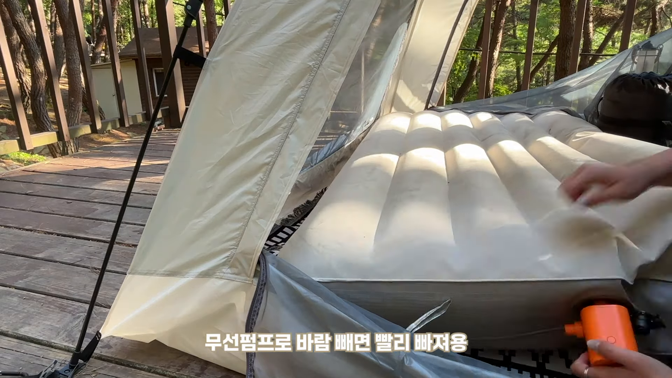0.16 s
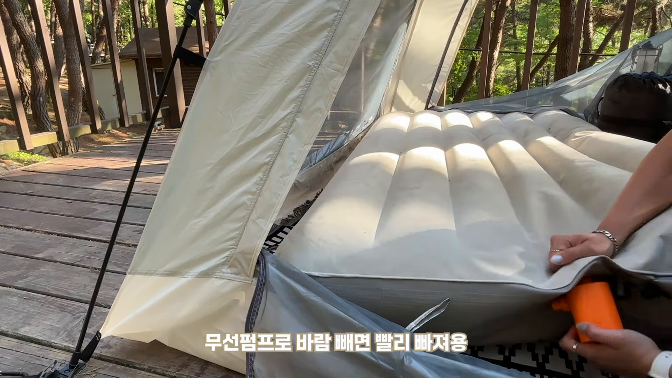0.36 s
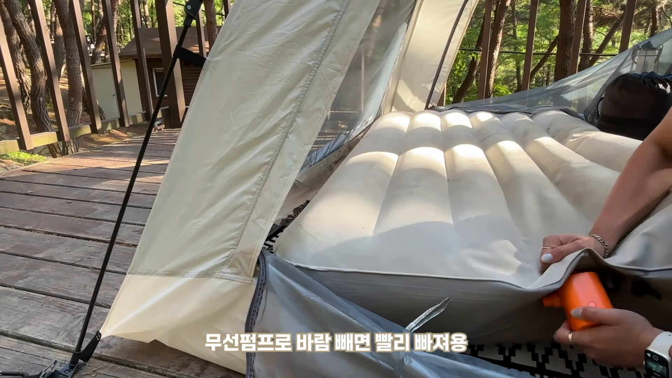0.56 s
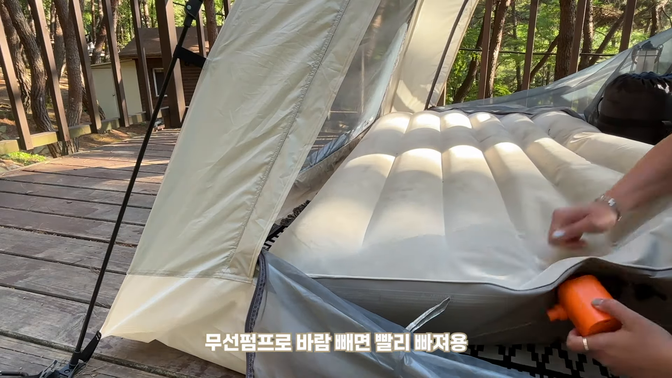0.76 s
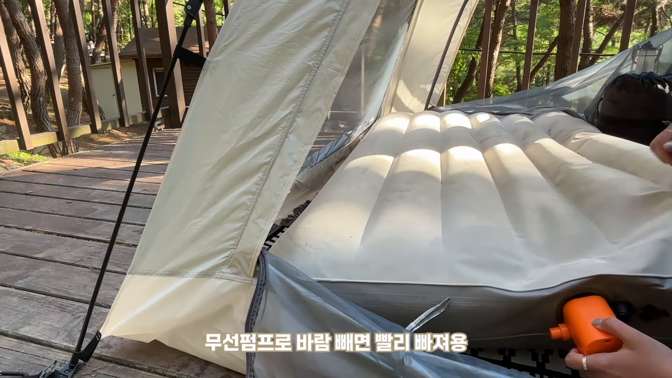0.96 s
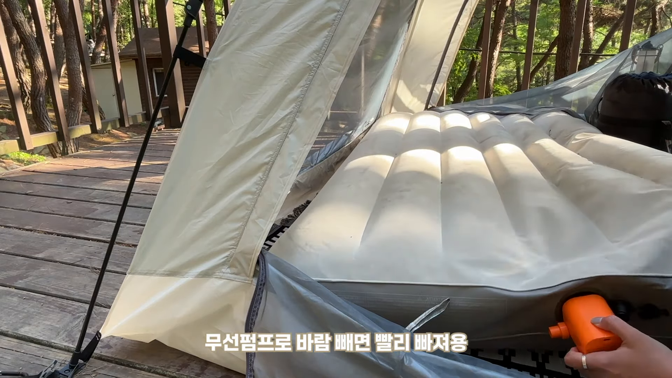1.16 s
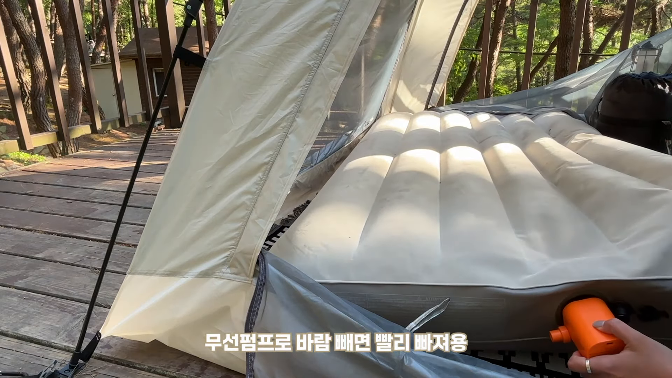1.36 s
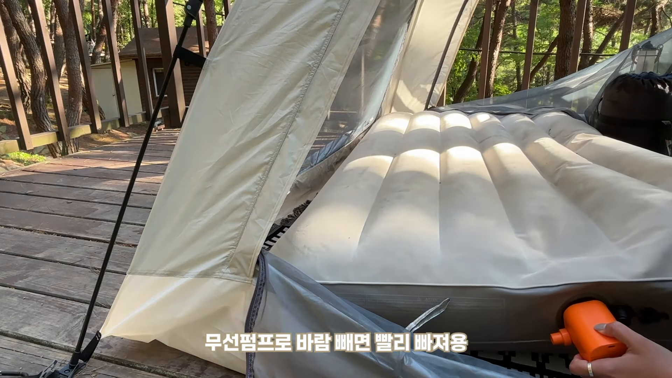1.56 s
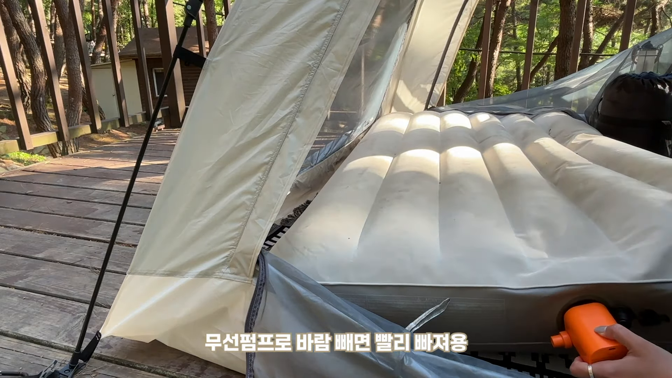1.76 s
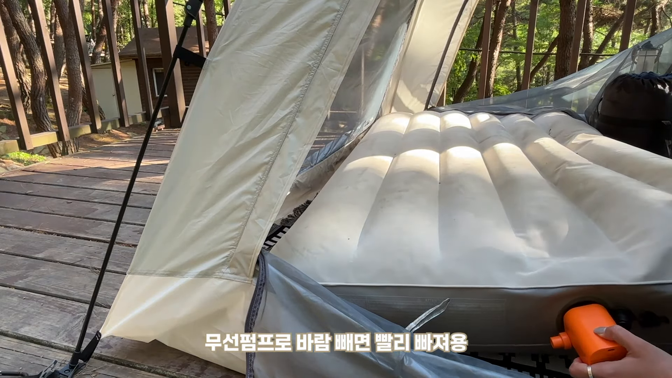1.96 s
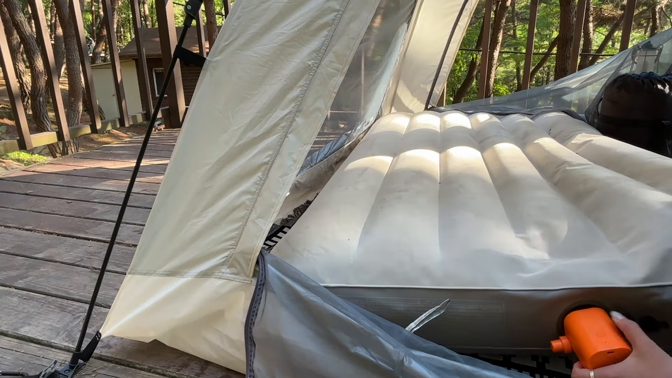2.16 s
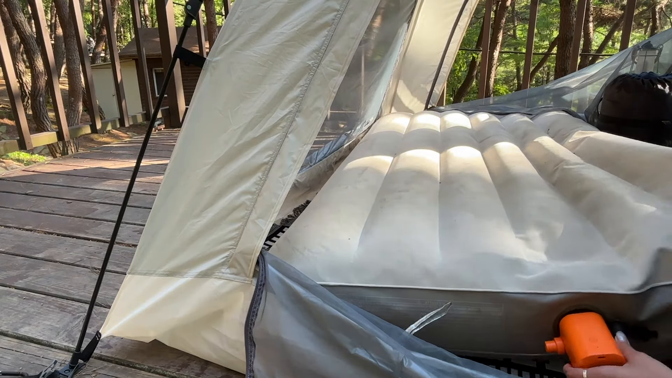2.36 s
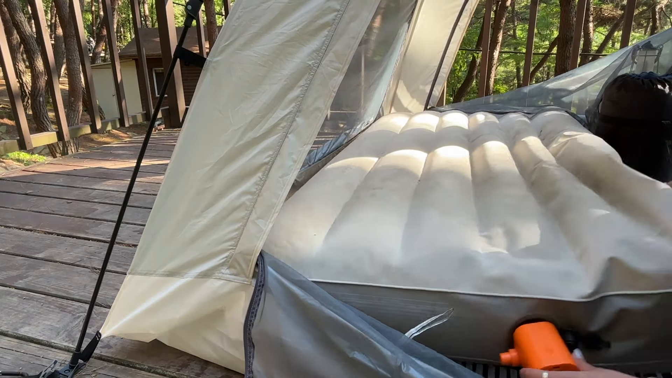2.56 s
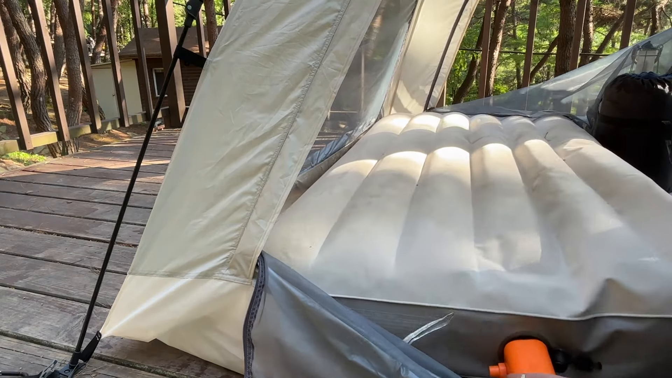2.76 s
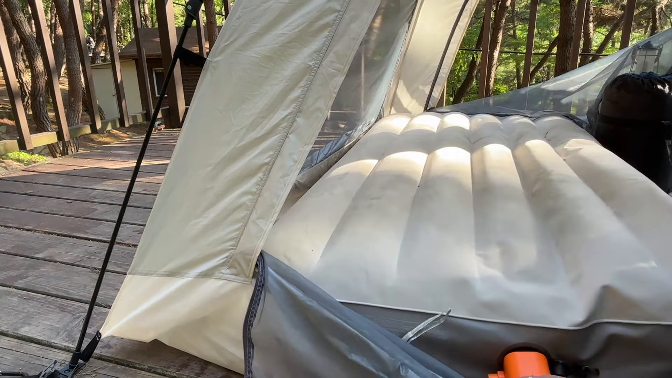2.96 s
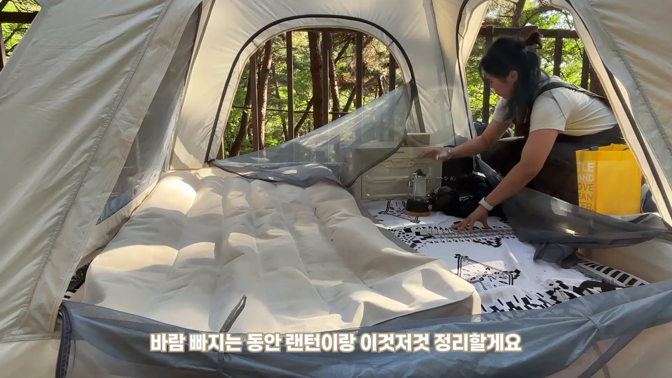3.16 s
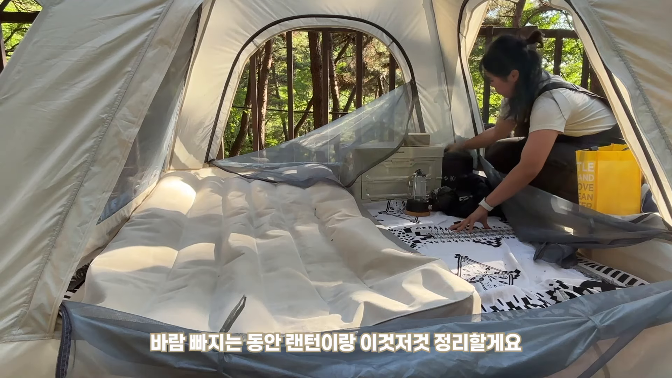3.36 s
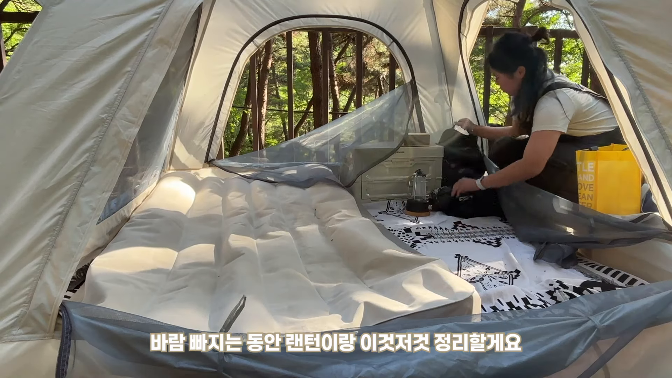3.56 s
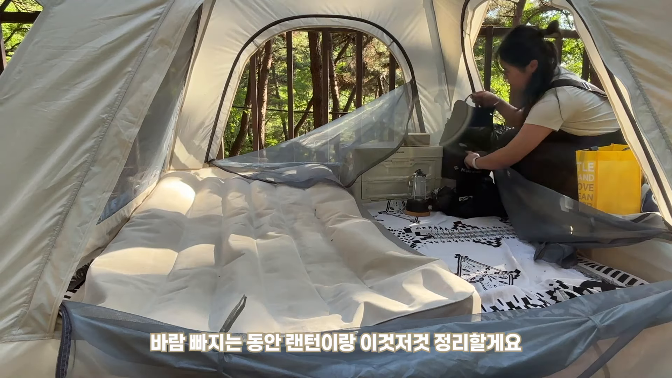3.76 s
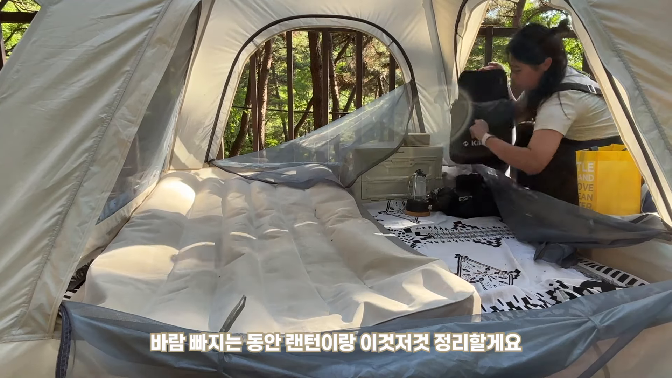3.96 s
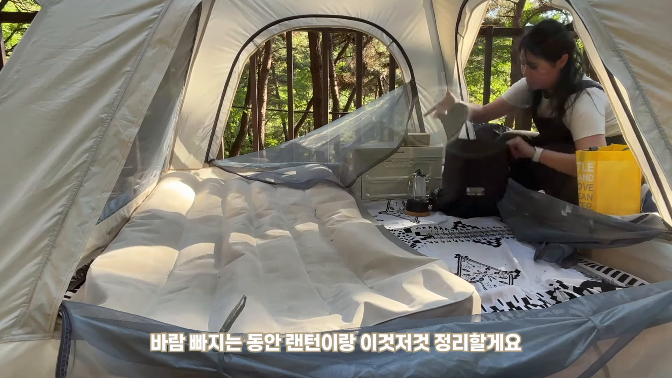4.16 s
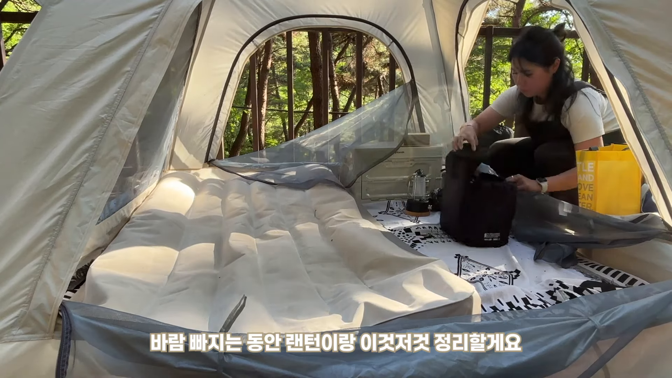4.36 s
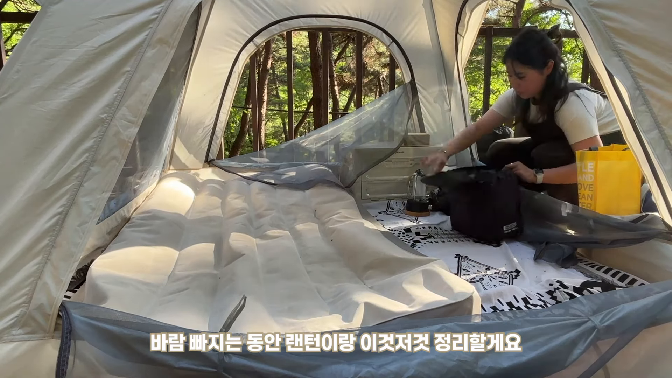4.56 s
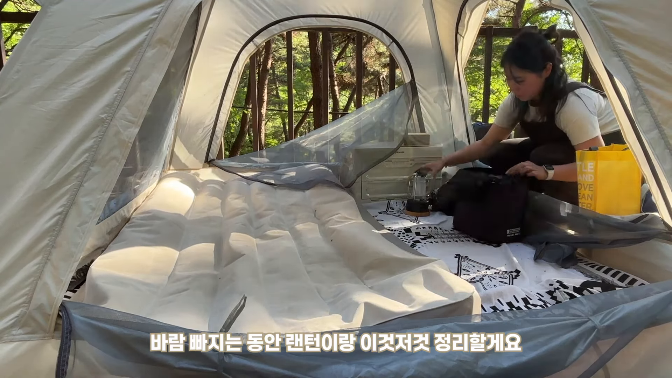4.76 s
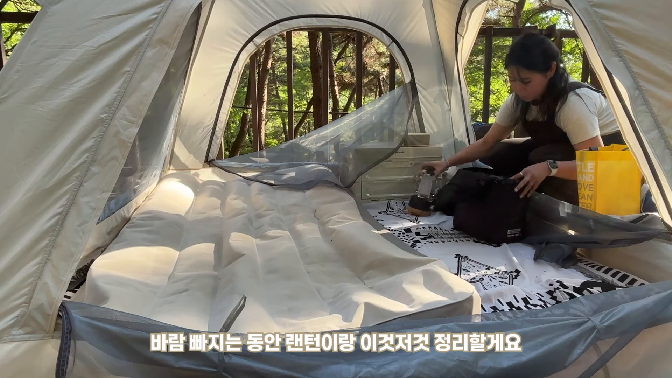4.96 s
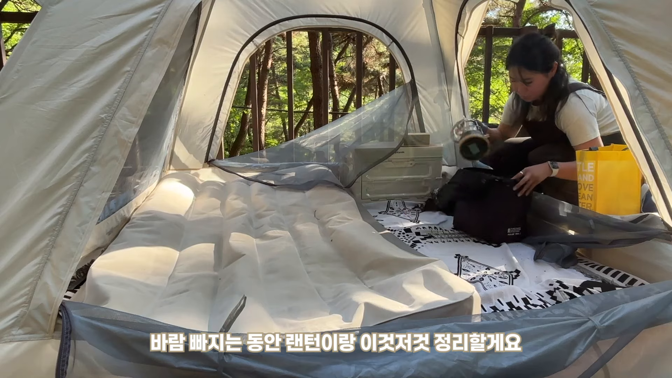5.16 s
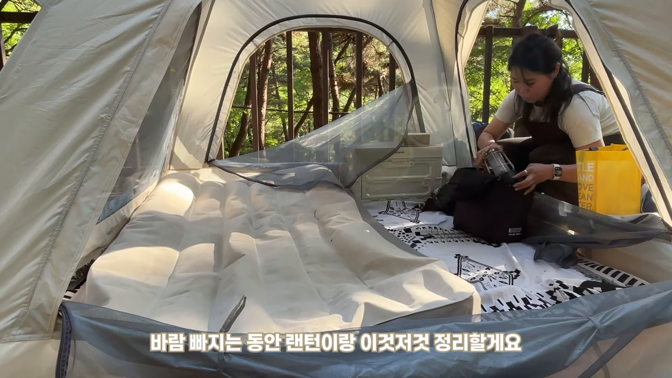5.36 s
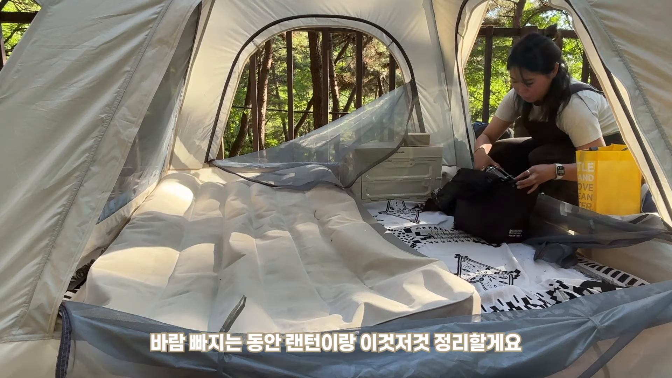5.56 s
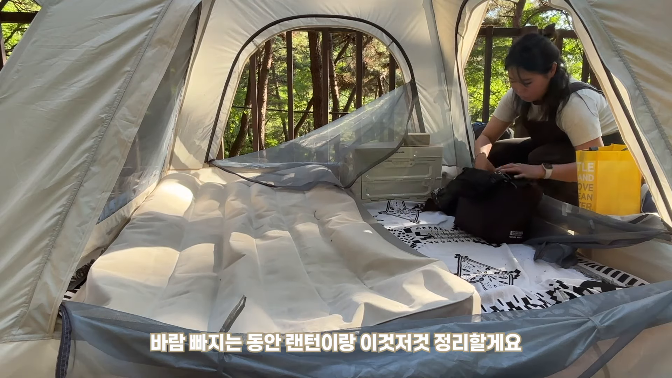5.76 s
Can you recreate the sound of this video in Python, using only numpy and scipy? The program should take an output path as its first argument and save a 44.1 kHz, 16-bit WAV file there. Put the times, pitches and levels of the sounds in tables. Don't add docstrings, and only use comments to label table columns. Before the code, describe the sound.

Outdoors, a very faint forest hush lies under close handling sounds. From 0.1 to 0.5 seconds coated fabric swishes, with a cluster of soft thuds on an air-filled mattress and small plastic ticks; a faint metallic tinkle follows near 0.7 and a crisp valve-cap click at 0.86. It is then nearly quiet until a thin, rapid insect trill at about 1.87 to 2.2. A switch clicks at 2.02 and a small pump spins up close by, its whine climbing steeply from about 2.2 and levelling near 2.6, with roaring air, hiss and shifting whistles as the hand moves it. At 3.07 the perspective jumps: the pump runs steadily and duller across the tent, its hiss slowly sinking. Packing adds light clicks around 4.2, a buckle and clip at 4.8 to 4.9, a strong case knock and sharp clacks at 5.3 to 5.45, and final ticks near 5.75. The pump keeps running.

```python
import sys
import numpy as np
from scipy import signal
from scipy.fft import rfft, irfft, next_fast_len
from scipy.io import wavfile
from scipy.ndimage import uniform_filter1d, map_coordinates

SR = 44100
rng = np.random.default_rng(int(sys.argv[2]) if len(sys.argv) > 2 else 0)


def transcribe(signal):
    frames = np.atleast_2d(signal).T
    limited = np.clip(frames, -1, 1)
    pcm = np.round(limited * 32767).astype(np.int16)
    wavfile.write(sys.argv[1], SR, pcm)


def volts_from_decibels(level):
    exponent = np.asarray(level, float) / 20
    return 10 ** exponent


N = 256662
TIME = np.arange(N) / SR
CUT_S = 3.069


def unit(x):
    return x / np.sqrt(np.mean(x ** 2) + 1e-20)


def along(points, hz):
    f, v = np.transpose(points)
    return np.interp(np.log(hz + 1), np.log(f + 1), v)


def curves(rows):
    s, *columns = np.transpose(rows)
    return [np.interp(TIME, s, column) for column in columns]


def wobble(rate):
    knots = rng.standard_normal(int(N * rate / SR) + 4)
    coarse = TIME[::16]
    return np.interp(TIME, coarse, map_coordinates(knots, [coarse * rate]))


def filtered(x, response):
    m = next_fast_len(len(x) + 8192)
    return irfft(rfft(x, m) * response(np.fft.rfftfreq(m, 1 / SR)), m)[:len(x)]


def resonances(modes, f):
    total = 0
    for k, (centre, width, db) in enumerate(modes):
        damping = 1j * f * width
        total = total + (-1) ** k * volts_from_decibels(db) * damping / (centre * centre - f * f + damping)
    return total


def rush(spectrum, modes, patchy_db, size=N):
    z = signal.stft(rng.standard_normal(size), nperseg=512)[2]
    field = uniform_filter1d(rng.standard_normal(z.shape), size=9, axis=0)
    field = uniform_filter1d(field, size=16, axis=1)
    noise = signal.istft(z * volts_from_decibels(patchy_db * unit(field)), nperseg=512)[1][:size]

    def colour(f):
        humps = sum(abs(resonances([mode], f)) ** 4 for mode in modes)
        return np.sqrt(volts_from_decibels(2 * along(spectrum, f)) + humps)

    return unit(filtered(noise, colour))


# (frequency [Hz], level [dB])
HUSH_COLOUR = [(60, -31), (85, -19.5), (120, -2.5), (200, -4), (330, -8.5), (470, -6), (700, -10),
               (1500, -9.5), (2100, -13.5), (2800, -20.5), (6000, -29.5), (10000, -30.5), (15800, -47)]
HUSH_DB = -61
GUST_S, GUST_LENGTH_S, GUST_DB = 4.18, .1, 3


def forest():
    gust_db = GUST_DB * np.exp(-.5 * ((TIME - GUST_S) / GUST_LENGTH_S) ** 2)
    swell_db = .6 * wobble(5)
    return volts_from_decibels(HUSH_DB + gust_db + 6.5 + swell_db) * rush(HUSH_COLOUR, [], patchy_db=1.0)


# (frequency [Hz], level [dB])
CLOTH_COLOUR = [(1500, -3), (3500, -0.5), (7000, 1.5), (10000, 0.5), (15500, -4.5)]
# (time of peak [s], peak level [dB], rise [dB/s], fall [dB/s])
STROKES = [
    (.12, -65, 30, 10),
    (.225, -60, 500, 12),
    (.31, -49.5, 69, 600),
    (.44, -62.5, 10, 60),
    (.69, -58, 200, 18),
    (1.25, -68, 30, 60),
    (2.1, -58.5, 62, 10),
]
STROKE_END_S, STILL_DB = 0.16, -72.5


def rustle():
    def stroke(s, db, rise, fall):
        slope_db = np.minimum(rise * (TIME - s), fall * (s - TIME))
        return volts_from_decibels(db + slope_db) * np.clip((s + STROKE_END_S - TIME) / .04, 0, 1)

    level = volts_from_decibels(STILL_DB) + np.max([stroke(*row) for row in STROKES], axis=0)
    grains = volts_from_decibels(-3.5 + 1.2 * wobble(120))
    hands_leave = np.clip((2.25 - TIME) / 0.077, 0, 1)
    return level * grains * rush(CLOTH_COLOUR, [], patchy_db=0.3) * hands_leave


# (time [s], centre frequency [Hz])
FLICKERS = [(.055, 13750), (.66, 8250), (.66, 13750), (1.235, 5500), (1.68, 5500), (1.68, 8950),
            (1.705, 15000), (1.75, 6300), (1.775, 7000), (1.775, 8950), (1.775, 10950), (1.775, 14350),
            (2.678, 6250), (3.035, 15000), (3.048, 6950), (3.513, 13700), (4.118, 13000), (4.235, 5750),
            (4.605, 11000), (5.07, 13000)]
FLICKER_WIDTH_HZ = 1450


def stereo_flicker(mono):
    side, window = np.zeros(N), np.hanning(1700)
    for s, hz in FLICKERS:
        at = round(s * SR) - len(window) // 2
        earlier = mono[at - 700:][:len(window)]
        band = filtered(earlier, lambda f: abs(f - hz) < FLICKER_WIDTH_HZ / 2)
        side[at:at + len(window)] += window * band
    return volts_from_decibels(-1.0) * side


# (frequency [Hz], width [Hz], level [dB])
CRACK = [(7000, 21000, 0)]


def click(t60, crack_db, bodies):
    t = np.arange(3000) / SR
    fade = volts_from_decibels(-60 * t / t60) * (1 - np.exp(-t / 0.0013))
    fade += volts_from_decibels(-29 - 60 * t / 0.087)
    blow = fade * rng.standard_normal((2, len(t)))
    blow[1, round(.0003 * SR)] += 5
    parts = [(crack_db + 4.5, filtered(blow[0], lambda f: resonances(CRACK, f)))]
    for hz, width, db in bodies:
        ring = filtered(blow[1], lambda f: resonances([(hz, width * hz, 0)], f) ** 2)
        parts.append((db, ring))
    return sum(volts_from_decibels(db) * part / abs(part).max() for db, part in parts)


# (time [s], peak level [dB], frequency [Hz], length [s])
THUDS = [(.2025, -46, 500, .0015), (0.2074, -29, 656, 0.0016), (.209, -44, 150, .003),
         (.213, -42, 300, 0.0012), (.219, -42, 300, .002), (0.236, -48, 400, 0.0022),
         (0.241, -47, 350, 0.0026), (0.271, -50, 300, .003), (.2955, -35, 530, 0.001),
         (0.304, -48, 450, 0.0024), (0.313, -35.5, 397, 0.00062), (0.321, -39, 604, 0.00071),
         (.355, -38, 510, 0.0018), (1.64, -58, 136, 0.016), (3.1, -42.5, 150, 0.006),
         (3.152, -56, 130.7, .012), (4.254, -42, 221, 0.0059), (5.303, -35, 400.3, 0.0021)]
# (time [s], peak level [dB], body frequency [Hz])
TICKS = [(.2013, -42, 1800), (.22, -54, 9000), (.267, -43, 3270), (.2926, -35.5, 2760), (.2933, -40, 1300),
         (.299, -42, 2800), (.32, -50, 1500), (.361, -58, 6000), (.415, -48, 3500), (.49, -45, 3000),
         (1.8014, -59, 6000), (2.15, -37, 8800), (4.197, -31, 2500), (4.258, -22, 2830),
         (5.3015, -17.5, 3260), (5.3035, -32, 12800), (5.379, -19.5, 3230), (5.455, -40, 1500),
         (5.741, -29, 1490), (5.7662, -23, 3300)]
TICK_WIDTH = 0.44
TICK_T60_S, TICK_CRACK_DB = 0.0062, -11
FAR_TICK_T60_S, FAR_CRACK_DB = 0.014, -9.5
# (t60 [s], crack level [dB], bodies (frequency [Hz], width [share of it], level [dB]))
VALVE_CAP = (0.0068, 1.9, [(2000, .7, -17), (4050, 0.27, -1.5), (4700, .22, -4.5), (7570, 0.13, 2.5),
             (11300, 0.13, 5.5), (14500, .15, 0)])
SWITCH = (.011, -7, [(1950, 1, 3), (4350, 0.64, 1), (10100, .2, -4)])
ZIP_PULL = (0.13, -14, [(4120, .06, -4), (6600, .03, -4)])
BUCKLE = (0.018, -12, [(2890, 0.33, 0), (7000, .25, -4), (14000, 0.46, 6)])
CLIP_ON = (.021, 2.5, [(6100, .16, 0.85), (10000, 0.33, 0)])
CASE = (0.011, -6, [(770, 0.32, -1.5), (1560, 0.17, -2), (2630, 0.2, -3), (10300, .15, -4.5)])
# (time [s], peak level [dB], object)
HITS = [
    (.672, -52, ZIP_PULL),
    (0.856, -30.5, VALVE_CAP),
    (2.0225, -33, SWITCH),
    (4.78, -26.5, BUCKLE),
    (4.909, -30, CLIP_ON),
    (5.2958, -24.5, CASE),
    (5.2978, -19, CASE),
    (5.3012, -32, CASE),
]


def handling():
    out, t = np.zeros(N + SR), np.arange(-1500, 1500) / SR
    for s, db, hz, length in THUDS:
        falling = np.cos(2 * np.pi * hz * (t - 0.15 * t ** 2 / length))
        knock = np.exp(-.5 * (t / length) ** 2) * falling
        out[round(s * SR) - len(t) // 2:][:len(t)] += volts_from_decibels(db) * knock
    ticks = []
    for s, db, hz in TICKS:
        t60, crack_db = (FAR_TICK_T60_S, FAR_CRACK_DB) if s > CUT_S else (TICK_T60_S, TICK_CRACK_DB)
        ticks.append((s, db, (t60, crack_db, [(hz, TICK_WIDTH, 0)])))
    for s, db, thing in HITS + ticks:
        sound = click(*thing)
        out[round(s * SR):][:len(sound)] += volts_from_decibels(db) * sound
    return out[:N]


# (frequency [Hz], width [Hz], level [dB])
WING = [(6250, 500, 3.5), (4600, 800, -8)]
TRILL_DB, PULSE_DB, PULSE_HZ, CREST_S = -53.5, 2.8, 10.15, 2.9


def insect():
    level_db = TRILL_DB + PULSE_DB * np.cos(2 * np.pi * PULSE_HZ * (TIME - CREST_S))
    at = np.round((1.8661 + .01257 * np.arange(26)) * SR).astype(int)
    clicks = np.zeros(N)
    clicks[at] = volts_from_decibels(level_db[at] + 24.5 + 1.9 * rng.standard_normal(len(at)))
    clicks += 0.4 * np.roll(clicks, round(0.0039 * SR))
    return filtered(clicks, lambda f: resonances(WING, f))


FULL_HZ, KNEE_S, RAMP_HZ_PER_S, SETTLE_S = 580.8, 2.352, 1310, .095


def spin_up():
    gap_hz, since = RAMP_HZ_PER_S * SETTLE_S, TIME - KNEE_S
    ramp = gap_hz - RAMP_HZ_PER_S * since
    approach = gap_hz * np.exp(-abs(since) / SETTLE_S)
    return np.maximum(FULL_HZ - np.where(since < 0, ramp, approach), 10)


def draught(spectrum, modes, patchy_db):
    start, size = 2 * SR, SR * 5 // 4
    return np.pad(rush(spectrum, modes, patchy_db, size=size), (start, N - start - size))


TONE_GROWS_DB, AIR_GROWS_DB = 94, 37


def rotor(shaft_hz, strong, weak, full_hz, jitter_hz, unsteady_db):
    shaft_hz = uniform_filter1d(shaft_hz, size=2000) + jitter_hz * wobble(40)
    turn = 2 * np.pi * np.cumsum(shaft_hz) / SR

    def tone(k, db):
        return np.sqrt(2) * volts_from_decibels(db) * np.sin(k * turn + 2 * np.pi * rng.random())

    main = sum(tone(k, uniform_filter1d(db, size=700) + 0.32 * wobble(25)) for k, db in strong.items())
    spool_db = TONE_GROWS_DB * np.log10(abs(shaft_hz) / full_hz)
    return main + sum(tone(round(k), db + spool_db + unsteady_db * wobble(9)) for k, db in weak)


# (multiple of shaft speed, level [dB])
NEAR_ORDERS = [(2, -56), (4, -50), (5, -55), (6, -57), (7, -56), (8, -55), (10, -62), (11, -56), (12, -63),
               (15, -60), (16, -58), (19, -64), (20, -63), (23, -65)]
# (frequency [Hz], level [dB])
ROAR = [(150, -50), (400, -12), (1200, -5.5), (1700, -16.5), (2500, -19), (3700, -21), (4600, -29),
        (6000, -41)]
# (frequency [Hz], width [Hz], level [dB])
ROAR_RING = [(808, 170, 0)]
# (frequency [Hz], level [dB])
LOOSE = [(1800, -27), (2300, -1), (2700, 0), (3100, 3.5), (3600, -6), (4300, -3), (5200, -27)]
# (frequency [Hz], level [dB])
SEATED = [(700, -25), (1100, -22), (1400, 1.5), (1700, -4), (2100, -8), (2600, -37)]
# (frequency [Hz], level [dB])
HISS = [(2500, -38), (4500, -11.5), (6300, -12.5), (8500, -9.5), (10400, -13.5), (10800, -22), (14000, -34),
        (15600, -34)]
# (frequency [Hz], width [Hz], level [dB])
HISS_RING = [(5430, 840, -1), (6450, 250, -3), (15500, 500, -8)]
# (frequency [Hz], width [Hz], level [dB])
VENT = [
    [(11330, 790, -1), (12300, 1200, -6), (14600, 900, -12)],
    [(13200, 500, -2), (13800, 500, -4), (12700, 500, -5), (14800, 900, -12)],
]
# (frequency [Hz], width [Hz], level [dB])
INLET = [(7290, 420, -1), (7540, 280, -2.5)]
# (frequency [Hz], width [Hz], level [dB])
SEAL = [
    [(9220, 490, -4), (9840, 400, -11)],
    [(10300, 370, 2), (9600, 370, 0)],
]
# (time [s], nearness [dB], inlet opening [dB], seal leak [dB], turned to mic [0-1])
GRIP = [
    (2.23, 2.5, -3.5, -10, .25),
    (2.3, -7, -1, -8, .3),
    (2.44, 1, 0.5, 7, 0.23),
    (2.52, -2, -4, 3.5, 0.5),
    (2.595, 0.5, -17, -1, 0.5),
    (2.65, 0, 2, -6.5, 0.67),
    (2.76, 0.5, 1.5, -12, .45),
    (2.93, 1, -3.5, -8, 0.25),
    (3.06, 0.5, -9, -2.5, 0.63),
]
BLADE_DB, UNBALANCE_DB, THIRD_DB = -23, -33.5, -42
BLADE_SEATED_DB, UNBALANCE_LOOSE_DB, THIRD_LOOSE_DB = -8, -3, -7
DUCT_HZ, DUCT_WIDTH_HZ, DUCT_DB = 740, 130, -54
ROAR_DB, VENT_DB, INLET_DB, SEAL_DB = -40, -44.5, -37.5, -37.5
PUSH_S, SEAT_S = 2.633, 0.52
REGRIP_S = 2.59
SHADE_DB = -15


def near_pump():
    shaft_hz = spin_up()
    near_db, opening_db, leak_db, turned = curves(GRIP)
    loose = np.clip(1 - (TIME - PUSH_S) / SEAT_S, 0, 1)
    turned = np.clip(turned, 0, 1)
    speed = np.log10(shaft_hz / FULL_HZ)
    flow_db, spool_db = AIR_GROWS_DB * speed, TONE_GROWS_DB * speed
    roar_db = ROAR_DB + flow_db
    silent = [(100, -120), (200, -120)]

    def facing(pair):
        away = draught(silent, pair[0], patchy_db=3.0)
        inward = draught(silent, pair[1], patchy_db=4.5)
        return np.sqrt(1 - turned) * away + np.sqrt(turned) * inward

    air = volts_from_decibels(roar_db + 0.56) * draught(ROAR, ROAR_RING, patchy_db=-1.5)
    air += volts_from_decibels(roar_db - 2.5) * loose * draught(LOOSE, [], patchy_db=2.5)
    air += volts_from_decibels(roar_db - 1.5) * (1 - loose) * draught(SEATED, [], patchy_db=1.0)
    air += volts_from_decibels(roar_db + 2.5 + 2.6 * loose) * draught(HISS, HISS_RING, patchy_db=1.0)
    shade_db = SHADE_DB * np.clip(2 * turned - 1, 0, 1)
    air += volts_from_decibels(VENT_DB + flow_db + shade_db) * facing(VENT)
    first_grip = draught(silent, INLET[1:], patchy_db=0.5)
    second_grip = draught(silent, INLET, patchy_db=1.5)
    air += volts_from_decibels(INLET_DB + flow_db + opening_db) * np.where(TIME < REGRIP_S, first_grip, second_grip)
    air += volts_from_decibels(SEAL_DB + flow_db + leak_db) * facing(SEAL)

    duct_pass = np.exp(-.5 * ((3 * shaft_hz - DUCT_HZ) / DUCT_WIDTH_HZ) ** 2)
    duct = volts_from_decibels(DUCT_DB + 4 * wobble(45)) * duct_pass
    blade_db = BLADE_DB + spool_db + near_db + BLADE_SEATED_DB * (1 - loose) ** 2
    unbalance_db = UNBALANCE_DB + 0.84 * spool_db + near_db + UNBALANCE_LOOSE_DB * loose + 1.3 * wobble(14)
    third_db = 20 * np.log10(volts_from_decibels(THIRD_DB + spool_db + THIRD_LOOSE_DB * loose) + duct)
    strong = {9: blade_db, 1: unbalance_db, 3: third_db}
    whine = rotor(shaft_hz, strong, NEAR_ORDERS, FULL_HZ, jitter_hz=.15, unsteady_db=1.8)
    air_starts = np.clip((TIME - 2.06) / 0.23, 0, 1)
    whine_starts = np.clip((TIME - 2.176) / 0.011, 0, 1)
    return air_starts * air + whine_starts * whine


# (time [s], shaft speed [Hz])
LOADED = [(3.1, 552.5), (3.25, 552.8), (3.42, 553.9), (3.55, 553.1), (3.9, 553.4), (4.03, 555), (4.2, 554),
          (4.38, 555.2), (4.56, 554.7), (4.75, 552.3), (4.92, 554), (5.1, 552.7), (5.25, 553.4),
          (5.45, 552.7), (5.8, 553.1)]
# (multiple of shaft speed, level [dB])
FAR_ORDERS = [(2, -58), (3, -52), (4, -58), (6, -52), (10, -67), (11, -62), (12, -64), (13, -63), (14, -64),
              (15, -53), (16, -67), (17, -65), (20, -73), (21, -71), (22, -68), (26, -73), (27, -72)]
# (frequency [Hz], level [dB])
FAR_ROAR = [(70, -72), (150, -16), (300, -14), (600, -5.5), (1200, -3), (2000, -9.5), (3300, -8.5),
            (4200, -7.5), (5400, -10.5), (7000, -37)]
# (frequency [Hz], width [Hz], level [dB])
FAR_ROAR_RING = [(794, 155, -2), (1595, 770, -1), (2330, 250, -1.5)]
# (frequency [Hz], level [dB])
FAR_HISS = [(4000, -32), (5800, -1.5), (7000, 2), (8500, -4.5), (11000, -5.5), (14000, -4), (15600, -17)]
# (frequency [Hz], width [Hz], level [dB])
FAR_HISS_RING = [(7490, 190, 2.5), (10200, 410, 0), (11600, 200, -9), (13170, 440, 4), (15500, 400, -1)]
FAR_BLADE_DB, FAR_UNBALANCE_DB, FAR_EIGHTH_DB = -37, -39, -43.5
FAR_ROAR_DB, FAR_HISS_DB = -37, -47.5
SAG_DB_PER_S = -0.96


def far_pump():
    shaft_hz, = curves(LOADED)
    sag_db = SAG_DB_PER_S * (TIME - CUT_S)
    air = volts_from_decibels(FAR_ROAR_DB + 0.69 * wobble(6.6)) * rush(FAR_ROAR, FAR_ROAR_RING, patchy_db=0.5)
    air += volts_from_decibels(FAR_HISS_DB + sag_db + 2.5) * rush(FAR_HISS, FAR_HISS_RING, patchy_db=0.95)
    strong = {9: FAR_BLADE_DB + .5 * wobble(8),
              1: FAR_UNBALANCE_DB + sag_db + .6 * wobble(6),
              8: FAR_EIGHTH_DB + .9 * wobble(8)}
    return air + rotor(shaft_hz, strong, FAR_ORDERS, 553.5, jitter_hz=.25, unsteady_db=1.2)


def scene():
    far = np.clip((TIME - CUT_S) / .001 + .5, 0, 1)
    mono = forest() + rustle() + handling() + insect()
    mono += (1 - far) * near_pump() + far * far_pump()
    side = stereo_flicker(mono)
    return np.array([mono + side, mono - side])


def top_cut(x):
    return signal.sosfilt(signal.butter(12, 16760, fs=SR, output="sos"), x)


def record(dry):
    wind_filter = signal.butter(3, 90, "highpass", fs=SR, output="sos")
    thinned = signal.sosfilt(wind_filter, dry)
    top_hz = 15740
    mix = np.array([filtered(channel, lambda f: f < top_hz) for channel in thinned])
    return top_cut(mix)


dry = scene()
out = record(dry)
transcribe(out)
```